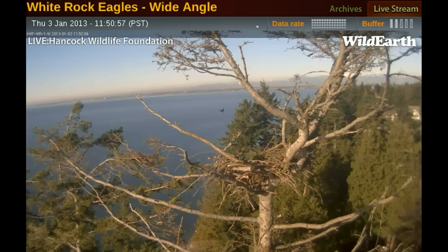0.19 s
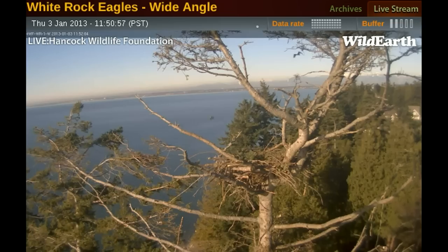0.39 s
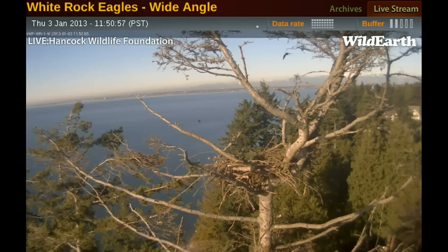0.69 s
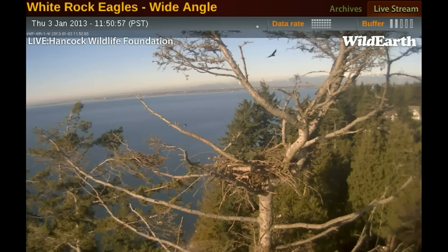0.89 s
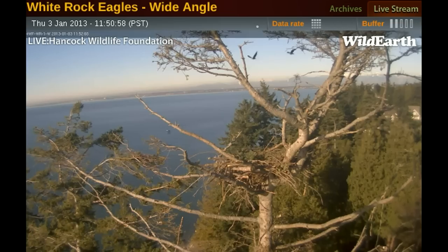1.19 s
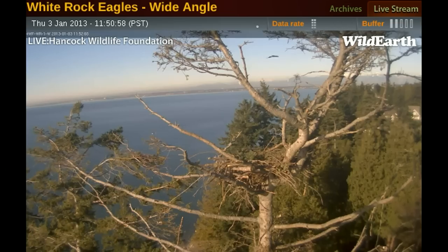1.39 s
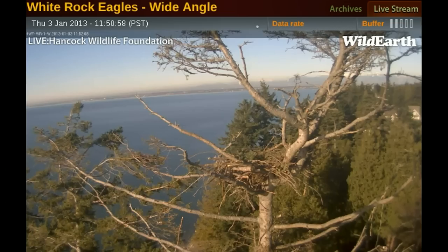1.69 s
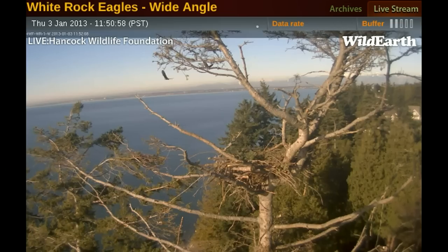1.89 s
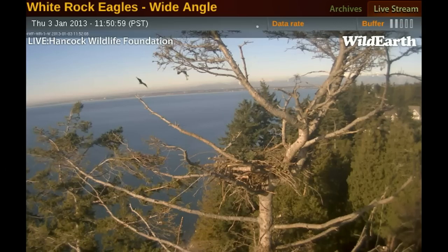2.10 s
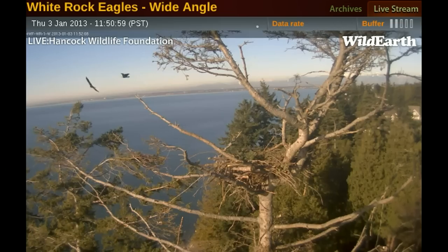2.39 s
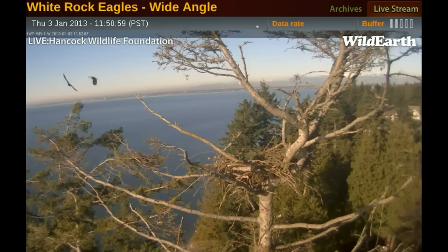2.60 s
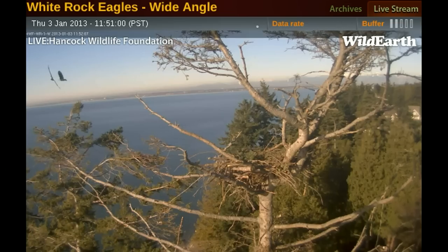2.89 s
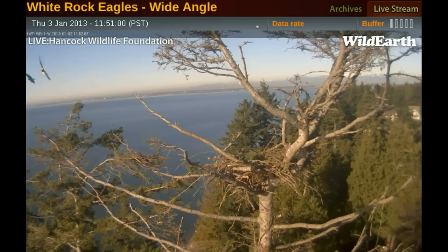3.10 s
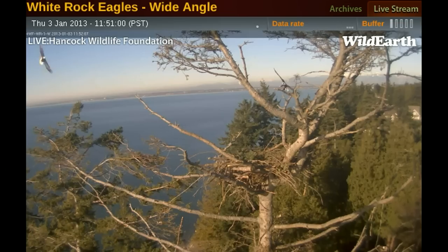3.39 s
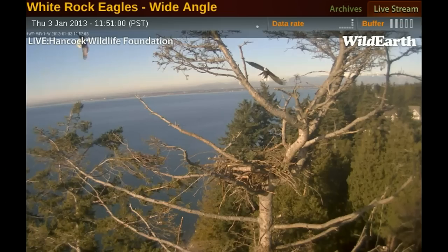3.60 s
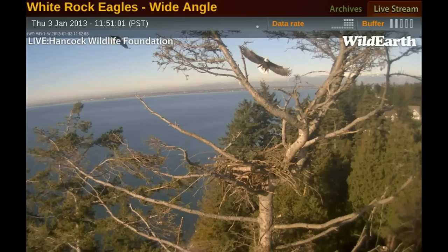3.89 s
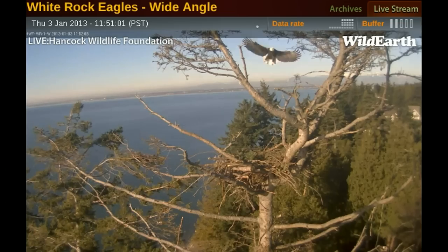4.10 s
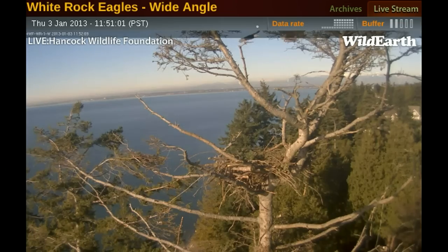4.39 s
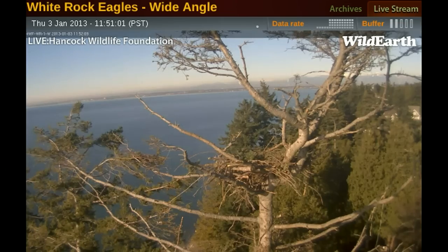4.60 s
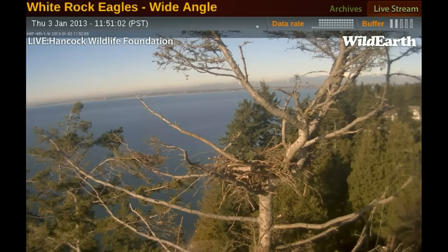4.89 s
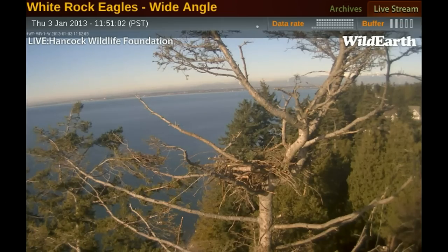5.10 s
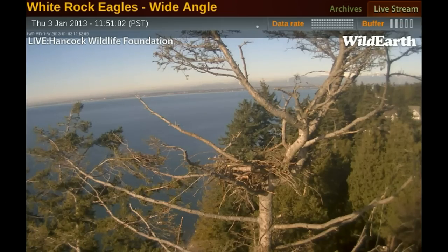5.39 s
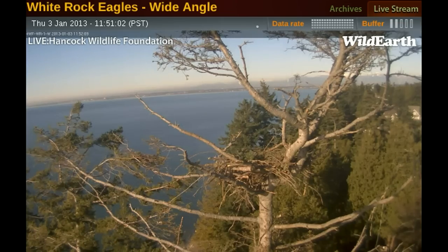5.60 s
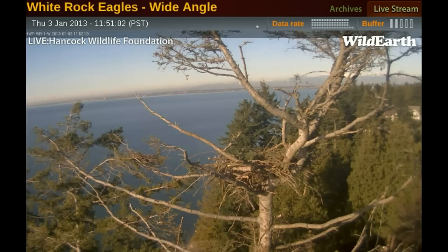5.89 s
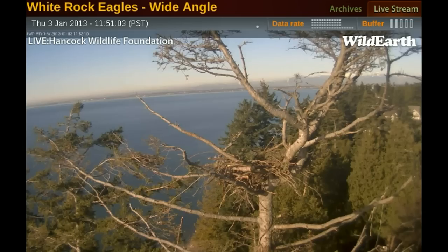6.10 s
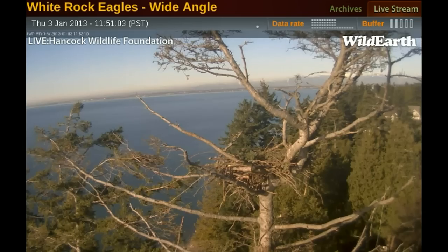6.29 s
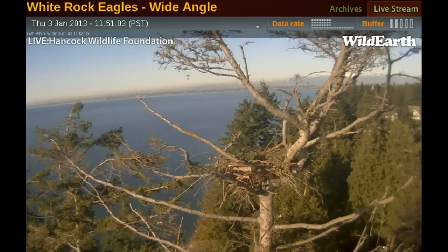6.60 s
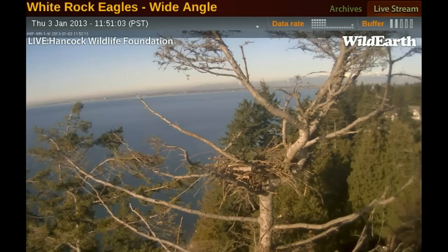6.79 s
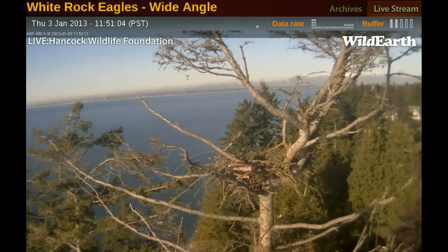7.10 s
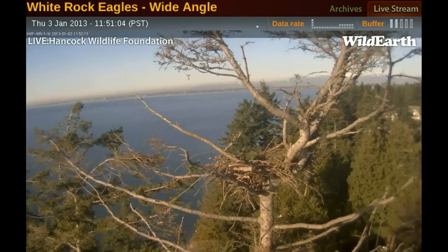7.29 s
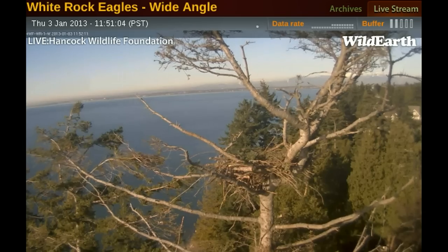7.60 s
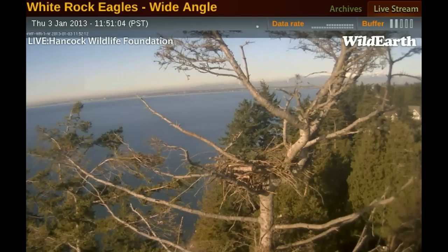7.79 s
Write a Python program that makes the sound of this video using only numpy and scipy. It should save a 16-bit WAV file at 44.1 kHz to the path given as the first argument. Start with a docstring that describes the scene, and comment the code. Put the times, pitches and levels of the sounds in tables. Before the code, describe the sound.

Approaching eagles give quick piping chirps and squeaky slides, getting nearer and echoing among trees, then soft wing flaps over rumbling wind and distant hiss.

```python
"""Treetop microphone: eagles chitter as they fly in, wing beats near the end, woods returning both.
Short near-sine notes on a few steady pitches carry faint overtones; breathy slides mix tone and noise.
Leaking air rings the pitches of the voice; each wing beat is a gust ringing the feathers.
Wind rumble on the housing and distant surf and traffic hiss are shaped noise; a thin, fuzzy whine is
narrowly resonant noise; sparse random echoes make the woods."""
import sys
import numpy as np
from scipy import signal
from scipy.io import wavfile
from scipy.ndimage import uniform_filter1d

SR = 44100
rng = np.random.default_rng(int(sys.argv[2]) if len(sys.argv) > 2 else 0)


def persist_wave(psi):
    """Save psi, clipped to +-1, as 16-bit WAV."""
    counts = np.round(np.clip(psi, -1, 1) * 32767).astype(np.int16)
    wavfile.write(sys.argv[1], SR, np.atleast_2d(counts).T)


N = 351477  # length in samples

# Colour of the distant wash. Each row: frequency in Hz, relative density in dB per Hz.
WASH_COLOUR = [(180, -4.5), (300, -8), (650, -11.5), (1200, -7.5), (1900, -15), (2700, -15.5),
               (4300, -19.5), (5200, -13), (8000, -22.5)]
# Slow swell of wash and wind, fullest in the wash's middle band. Each row: time in seconds, change in dB.
SWELL = [(0, -5), (3, -4), (7, -1), (8, 2)]
# Steady fuzzy whine. Each row: frequency in Hz, resonance width in Hz, level in dB.
WHINES = [(2198.5, 67, -52)]
# Colour of the wind on the housing. Each row: frequency in Hz, relative density in dB per Hz.
WIND_COLOUR = [(26, 1), (40, 9), (55, -0.5), (75, -10), (91, -2.5), (110, -13.5), (200, -20), (400, -67.5)]
# Wing beats. Each row: start in seconds, level in dB.
WING_BEATS = [(6.729, -30.5), (7.006, -29), (7.277, -32.5), (7.563, -31), (7.834, -33)]
# Whistles of the feathers. Each row: settled frequency in Hz, resonance width in Hz, relative level in dB.
FEATHERS = [(776, 58, -1), (912, 63, -10.5), (1350, 630, 3.5), (1632, 180, 1), (2310, 200, -2.5)]
# Pitches where the voice settles, and the rasp above. Each row: frequency in Hz, width in Hz, mid level in dB.
VOICE_STEPS = [(2700, 130, -1.5), (3357, 64, -2), (4118, 300, 1.5), (5300, 2700, -4)]
# Far runs of evenly spaced notes. Each row: start in seconds, spacing in seconds, first pitch in Hz,
# last pitch in Hz, list of the level of each note in dB.
RUNS = [(1.215, 0.087, 3540, 3420, [-48, -46, -40.5, -39, -45]),
        (1.502, 0.095, 2700, 2694, [-46, -42.5, -43]),
        (2.006, 0.098, 3530, 3440, [-42, -42, -34.5, -40.5, -45]),
        (2.02, 0.08, 4220, 4340, [-44, -41, -43]), (2.384, .104, 2740, 2700, [-42.5, -44]),
        (2.716, 0.094, 3614, 3425, [-41.5, -34, -32, -36.5, -41]), (3.012, 0.094, 2835, 2820, [-35, -34])]
# Single notes; nearly shared times are two strong overtones of one cry. Each row: nominal start in seconds,
# nominal length in seconds, pitch in Hz, glide in % over that length, level in dB.
NOTES = [(0.006, 0.036, 3420, -2, -46), (1.162, 0.032, 3360, -2.5, -49), (1.66, 0.0093, 4020, -2, -38),
         (1.913, 0.049, 3570, -5.5, -39), (1.99, .012, 2930, -3.5, -32), (2.033, 0.036, 2940, -3.5, -41),
         (2.218, 0.018, 4160, 2, -38), (2.698, 0.014, 2680, 8.5, -39), (2.738, 0.04, 2930, -4, -43),
         (2.845, .016, 2680, 10, -39), (2.886, 0.04, 2980, -9.5, -49), (2.962, 0.023, 3530, -5.5, -42),
         (3.191, 0.037, 2655, -3, -34.5), (3.278, 0.031, 3550, -3.5, -39), (3.414, 0.031, 3490, -0.5, -33),
         (3.443, 0.01, 4330, -1.5, -31), (3.45, .011, 3455, 0, -30.5), (3.521, 0.048, 3500, -1, -36.5),
         (3.522, 0.013, 4150, -8, -41), (3.578, 0.012, 3360, 0.5, -25.5), (3.595, 0.027, 3520, -3.5, -31),
         (3.622, 0.017, 3450, -2, -30), (3.636, 0.027, 2856, -7, -29), (3.685, 0.084, 3430, -3, -38),
         (3.729, .012, 2750, -1, -35), (3.798, 0.04, 2745, -6, -39.5), (3.832, 0.014, 2630, -3.5, -32),
         (3.879, 0.017, 4160, -7, -26.5), (4.026, 0.032, 3420, -1.5, -33.5), (4.058, 0.031, 3430, -3, -33),
         (4.136, 0.053, 2900, -3, -41), (4.223, 0.034, 3510, -3.5, -36.5), (4.241, 0.031, 2726, -4, -30),
         (4.242, 0.012, 5410, -0.5, -32.5), (4.326, 0.012, 4360, 0, -30.5), (4.337, 0.03, 3370, 1, -40),
         (4.409, 0.0089, 4330, -3.5, -29.5), (4.417, 0.034, 3457, -0.5, -32), (4.449, .01, 2910, 0, -28.5),
         (4.452, 0.02, 3370, -2.5, -27), (4.47, .013, 2704, 3.5, -29), (4.507, 0.021, 3410, 1.5, -29),
         (4.566, 0.027, 2700, 1, -29.5), (4.594, 0.012, 2644, -3, -30), (4.681, 0.016, 2670, -2.5, -23.5),
         (4.892, 0.032, 3295, 2.5, -28), (4.917, 0.014, 2610, 8, -30), (4.929, 0.04, 3530, 2.5, -36),
         (5.032, 0.03, 3700, -5.5, -29), (5.092, 0.065, 3426, -1.5, -32.5), (5.122, 0.01, 2710, 3, -24),
         (5.128, 0.044, 3560, -1, -32.5), (5.22, 0.015, 3480, 0.5, -29.5), (5.242, .015, 2700, 6.5, -32.5),
         (5.329, 0.029, 3360, -1, -21.5), (5.353, 0.012, 2750, -3, -24), (5.423, 0.016, 2650, -2, -30),
         (5.424, 0.012, 5170, -0.5, -38), (5.444, 0.015, 2550, -3, -32.5), (5.51, 0.03, 3480, -4, -35.5),
         (5.642, 0.021, 3484, 1.5, -25.5), (5.663, 0.011, 2837, 1, -19), (5.664, .011, 3420, 2.5, -22.5),
         (5.741, 0.022, 3517, -1, -25), (5.772, 0.013, 2880, -2, -43), (5.807, 0.026, 3375, 4.5, -26),
         (5.846, 0.017, 3460, -3, -23.5), (5.874, 0.01, 2850, 4.5, -15.5),
         (5.891, 0.017, 2950, -8.5, -23.5), (5.948, 0.01, 3390, -0.5, -27.5),
         (6.058, 0.0094, 5270, -2, -30), (6.055, 0.022, 2590, -1.5, -28.5), (6.246, 0.025, 3355, 2, -25.5),
         (6.359, 0.015, 2860, 5.5, -32.5), (6.465, 0.015, 2770, -4, -26.5), (6.466, 0.017, 5410, -1, -27),
         (6.584, 0.03, 3455, 4, -24), (6.585, 0.014, 2905, -3, -31.5), (6.615, 0.037, 4440, -3.5, -34),
         (6.67, 0.013, 3940, 3, -31), (6.671, .014, 2800, 5.5, -30), (6.672, 0.021, 3446, -4, -27),
         (6.696, 0.014, 2757, 1.5, -28.5), (6.739, 0.0082, 4100, -6, -20), (6.756, .009, 4240, -4.5, -22),
         (6.771, .009, 4100, 0.5, -25.5), (6.799, 0.026, 2700, -6.5, -33.5),
         (6.859, 0.0091, 4240, -3, -29.5), (6.905, 0.021, 2586, 11, -20), (6.925, 0.021, 4220, -4.5, -30),
         (6.928, 0.034, 3544, -1.5, -30), (6.963, 0.018, 4180, 0.5, -28), (6.992, 0.0072, 3930, 5, -18),
         (7.105, 0.0095, 3730, -2.5, -28), (7.121, 0.016, 3312, -1.5, -17), (7.125, 0.012, 3850, -1.5, -19),
         (7.148, 0.0059, 2690, 3, -28.5), (7.187, 0.0069, 2700, -2.5, -29.5),
         (7.204, 0.034, 3440, -1.5, -21), (7.248, 0.028, 3380, 0, -32), (7.325, 0.019, 3600, -8.5, -31),
         (7.326, 0.01, 4330, -4, -29.5), (7.347, 0.012, 2710, 1, -25), (7.488, .012, 2700, 2, -34.5),
         (7.504, 0.019, 3456, 0, -23.5), (7.531, 0.022, 3465, -4, -23.5), (7.561, 0.017, 3360, 0, -20.5),
         (7.585, 0.01, 2736, -3.5, -22), (7.671, 0.013, 2520, -3, -27.5), (7.758, 0.015, 2630, 8.5, -33.5),
         (7.784, 0.043, 3397, 1, -24), (7.892, 0.0094, 2826, -1.5, -20.5)]
# Breathy slides to or from the treble. Each row: start in seconds, nominal length in seconds,
# start pitch in Hz, end pitch in Hz, level in dB.
SLIDES = [(2.808, 0.037, 6600, 5770, -40), (3.357, 0.034, 6400, 6170, -37.5),
          (3.955, 0.0095, 7300, 4910, -32), (4.605, 0.038, 6600, 5440, -40),
          (5.052, 0.012, 6470, 5450, -34), (5.838, 0.079, 6360, 4300, -43.5),
          (6.236, 0.0058, 5530, 3880, -35), (6.344, 0.016, 5500, 3460, -36),
          (6.657, 0.013, 5400, 3760, -34), (6.665, 0.03, 6200, 6300, -37), (6.747, 0.065, 4500, 5580, -40),
          (6.826, 0.011, 3850, 6700, -34.5), (6.842, 0.029, 6780, 4780, -33),
          (6.963, 0.024, 5800, 4110, -32), (7.308, 0.015, 5200, 3500, -34), (7.55, 0.01, 5400, 4100, -38),
          (7.654, 0.014, 6870, 5380, -31), (7.879, 0.0095, 5000, 3440, -30.5)]

WASH_DB, WIND_DB, BREATH_DB, HISS_DB = -40.5, -30, -50, -83.5
VOICE_HZ = 690  # low voice of which each note is an overtone
BELOW_DB, ABOVE_DB, BRIGHT_DB = -24, -17, -25  # mean levels: overtone below, above, and under the octave
UNEVEN_DB = 4  # random spread of those levels
RUN_NOTE_S, RUN_GLIDE = 0.02, -3.5  # nominal length in seconds, glide in %
AFTER_S, AFTER_DB = 0.02, -14  # trailing note: lag in seconds, relative level in dB
AFTER_DROP, AFTER_GLIDE = 0.025, -2.5  # trailing note: share of pitch lost, glide in %
EDGE_HZ, OFFSET = 15750, 0.2766  # band limit in Hz, steady offset as a share of full scale


def gain_of(db):
    """Turns decibels into an amplitude factor."""
    return 10 ** (np.asarray(db) / 20)


def evened(x):
    """Scales a signal to an RMS of one."""
    return x / np.sqrt(np.mean(x ** 2) + 1e-20)


def read_curve(points, hz):
    """Reads a table of frequencies and values, interpolating on a log-frequency scale."""
    f, value = np.transpose(points)
    return np.interp(np.log(hz + 1), np.log(f + 1), value)


def swell_db(s):
    """Level change of the swell at the given seconds."""
    return np.interp(s, *np.transpose(SWELL))


def add(mix, s, sound):
    """Lays a sound into the mix at s seconds, cut off at the end of the mix."""
    part = mix[round(s * SR):][:len(sound)]
    part += sound[:len(part)]


def resonate(x, hz, width):
    """Shifts the curve hz down to zero, smooths twice, and shifts back: a steep resonance."""
    turn = np.exp(2j * np.pi * np.cumsum(hz * np.ones(len(x))) / SR)
    r = np.exp(-np.pi * width / SR)
    smooth = signal.lfilter([(1 - r) ** 2], [1, -2 * r, r * r], x / turn)
    return 2 * (turn * smooth).real


def noise(colour_db, size, patchy_db):
    """Random short-time spectra under colour_db(hz, s), with drifting patches."""
    frames, hz = 4 * N // size + 5, np.fft.rfftfreq(size, 1 / SR)[:, None]
    a, b, patches = rng.standard_normal((frames, len(hz), 3)).T
    patches = uniform_filter1d(patches, size=8, axis=0)
    patches = evened(uniform_filter1d(patches, size=8, axis=1))
    seconds = np.arange(frames) * size / 4 / SR
    spectra = (a + 1j * b) * gain_of(colour_db(hz, seconds) + patchy_db * patches)
    sound = signal.istft(spectra, nperseg=size, noverlap=3 * size // 4)[1]
    return evened(sound[:N])


def wash():
    """Distant surf and traffic: hiss whose middle band grows, with the whine standing in it."""
    def colour_db(hz, s):
        middle = np.exp(-np.log((hz + 1) / 1200) ** 2)  # centred near 1200 Hz
        return read_curve(WASH_COLOUR, hz) + middle * swell_db(s)

    sound = gain_of(WASH_DB) * noise(colour_db, size=1024, patchy_db=1.7)
    for hz, width, db in WHINES:
        sound += gain_of(db) * evened(resonate(rng.standard_normal(N), hz, width))
    return sound


def wind():
    """Low lumpy rumble on the microphone housing that freshens along with the wash."""
    def colour_db(hz, s):
        return read_curve(WIND_COLOUR, hz) + 0.63 * swell_db(s)

    return gain_of(WIND_DB) * noise(colour_db, size=8192, patchy_db=0.5)


def woods(x, t60, rise):
    """Sparse echoes of random sign from branches and trunks build up over rise and die over t60 seconds."""
    t = np.arange(SR // 2) / SR
    taps = np.zeros(len(t))
    at = np.arange(200, len(taps) - 20, 20)  # one echo in every 20 samples
    taps[at + rng.integers(0, 20, len(at))] = rng.choice([-1., 1.], len(at))
    taps *= gain_of(-60 * t / t60) * (1 - np.exp(-t / rise))
    return signal.fftconvolve(x, taps / np.linalg.norm(taps))[:N]


def wings():
    """Each downstroke drives a gust through the feathers; their whistle falls as the stroke slows."""
    out, t = np.zeros(N), np.arange(round(SR / 8)) / SR
    force = (t / 0.011) ** 2 * np.exp(2 - 2 * t / 0.014)  # strongest 14 ms in
    fall = 1 + 0.32 * np.exp(-t / 0.011)
    for s, beat_db in WING_BEATS:
        gust = rng.standard_normal((len(FEATHERS), len(t))) * force
        for air, (hz, width, db) in zip(gust, FEATHERS):
            ring = resonate(air, hz * fall, width)
            add(out, s, gain_of(beat_db + db) * ring / abs(ring).max())
    return out


def breath(voice):
    """Leaking air rings the voice's steps in lumps, during and just after the notes."""
    power = signal.lfilter([1], [1, -np.exp(-1 / (0.008 * SR))], voice ** 2)  # 8 ms decay
    loudness = abs(power) ** 0.21
    lumps = rng.standard_normal((N, len(VOICE_STEPS)))
    lumps = evened(uniform_filter1d(lumps, size=500, axis=0)).T
    air = np.zeros(N)
    for (hz, width, db), lump in zip(VOICE_STEPS, lumps):
        ring = evened(resonate(rng.standard_normal(N), hz, width))
        air += gain_of(db + 9.8 * np.tanh(lump)) * ring
    return loudness * air


def slide(length, hz0, hz1, db):
    """While the pitch slides, the membranes vibrate unevenly: a tone half lost in a moving band of noise."""
    hz = np.geomspace(hz0, hz1, round(1.2 * length * SR))
    fuzz = evened(resonate(rng.standard_normal(SR // 10)[:len(hz)], hz, 610))
    tone = np.sqrt(2) * np.sin(2 * np.pi * np.cumsum(hz) / SR)
    return gain_of(db) * (fuzz + 0.4 * tone) * signal.windows.tukey(len(hz), 0.6)


def note(length, hz, end_hz, db):
    """A near sine with a weak octave; it swells fast, flutters and dies."""
    t = np.arange(round(1.373 * length * SR)) / SR  # it sounds past its nominal length
    flutter = uniform_filter1d(rng.standard_normal((2, SR // 5)), size=120, axis=1)
    pitch_flutter, level_flutter = evened(flutter)[:, :len(t)]
    scoop = 0.046 * np.exp(-t / (0.2 * length))  # the pitch is reached from below
    glide = hz + (end_hz - hz) * (t / length) ** 1.38
    turns = np.cumsum(glide * (1 + 0.0092 * pitch_flutter - scoop)) / SR
    octave_db = -19 - 14 * np.log2(hz / 3000)  # low notes are richer
    tone = np.sin(2 * np.pi * turns) + gain_of(octave_db) * np.sin(4 * np.pi * turns)
    shape = np.sin(np.pi * (t / t[-1]) ** 0.76) ** 1.27
    return np.sqrt(2) * gain_of(db + 2.0 * level_flutter) * shape * tone


def runs():
    """Spells each run out as notes stepping in pitch, each trailing a softer, longer, lower one."""
    rows = []
    for start, gap, hz0, hz1, levels in RUNS:
        pitches = np.linspace(hz0, hz1, len(levels))
        for k, (hz, db) in enumerate(zip(pitches, levels)):
            s = start + k * gap
            rows.append((s, RUN_NOTE_S, hz, RUN_GLIDE, db))
            rows.append((s + AFTER_S, 2 * RUN_NOTE_S, hz * (1 - AFTER_DROP), AFTER_GLIDE, db + AFTER_DB))
    return rows


def cry(voice, s, length, hz, glide, db):
    """Adds one strong overtone of the low voice and the faint, uneven ones that the throat lets through."""
    k = round(hz / VOICE_HZ)
    below, above, bright = UNEVEN_DB * rng.standard_normal(3)
    overtones = [(k, 0), (k - 1, BELOW_DB + below), (k + 1, ABOVE_DB + above), (2 * k - 1, BRIGHT_DB + bright)]
    for n, rel_db in overtones:
        if n in (k, 4, 5, 6, 9):  # the throat mutes the others
            share = 1 if n == k else 0.65  # the faint overtones die early
            start_hz = n / k * hz
            end_hz = start_hz * (1 + share * glide / 100)
            add(voice, s - 0.12 * length, note(share * length, start_hz, end_hz, db + rel_db))


def eagles():
    """All notes with their overtones, the slides and the leaking air."""
    voice, slides = np.zeros(N), np.zeros(N)
    for row in runs() + list(NOTES):
        cry(voice, *row)
    for s, *rest in SLIDES:
        add(slides, s, slide(*rest))
    return voice + slides + gain_of(BREATH_DB) * breath(voice)


def scene():
    """Birds nearing the microphone, with near and far woods answering over wind and wash."""
    birds = eagles() + wings()
    far = birds * gain_of(np.linspace(-4, -18, N))  # the nearer the birds, the less the far woods count
    foliage = signal.butter(2, 3700, fs=SR, output="sos")  # foliage swallows the treble
    far_woods = woods(signal.sosfilt(foliage, far), t60=0.98, rise=0.0082)
    near_woods = gain_of(-11.5) * woods(birds, t60=0.07, rise=0.014)
    return (birds + near_woods + far_woods + wind() + wash())[None]


def record(dry):
    """A narrow-band link, faint hiss after it, the band limit and the converter's steady offset."""
    link = signal.sosfilt(signal.cheby2(7, 44, 9800, fs=SR, output="sos"), dry)  # 44 dB down from 9800 Hz
    link += gain_of(HISS_DB) * rng.standard_normal(dry.shape)
    band_limit = signal.firwin(511, EDGE_HZ, window=("kaiser", 9), fs=SR)
    return signal.oaconvolve(link, band_limit[None], "same") + OFFSET


dry = scene()
out = record(dry)
persist_wave(out)
```